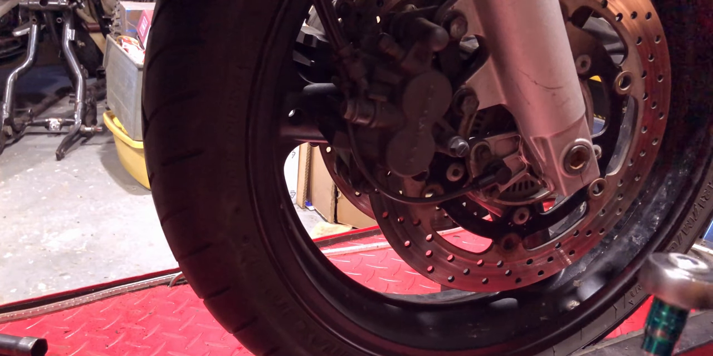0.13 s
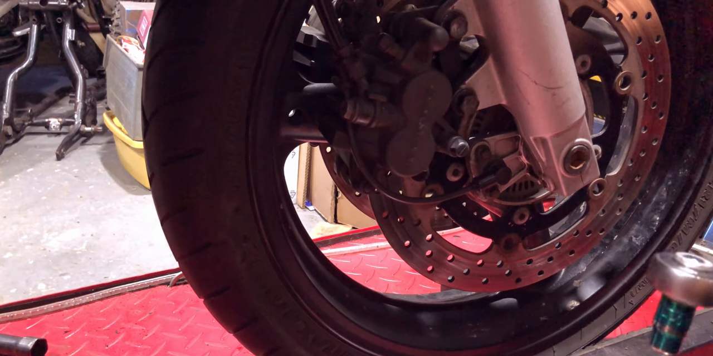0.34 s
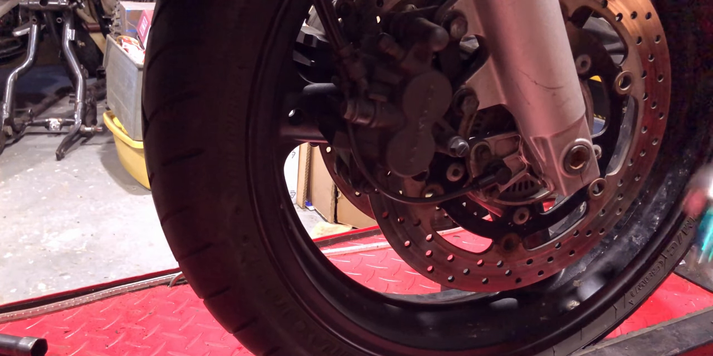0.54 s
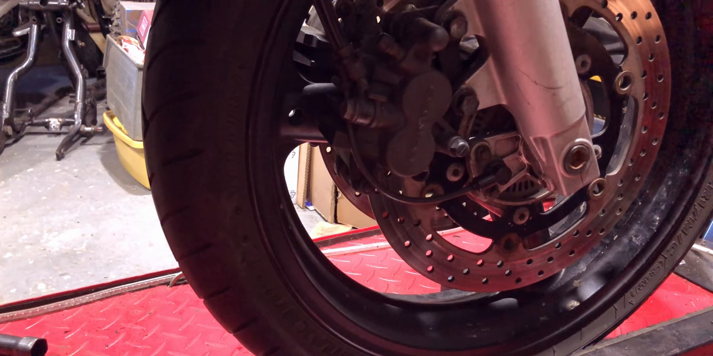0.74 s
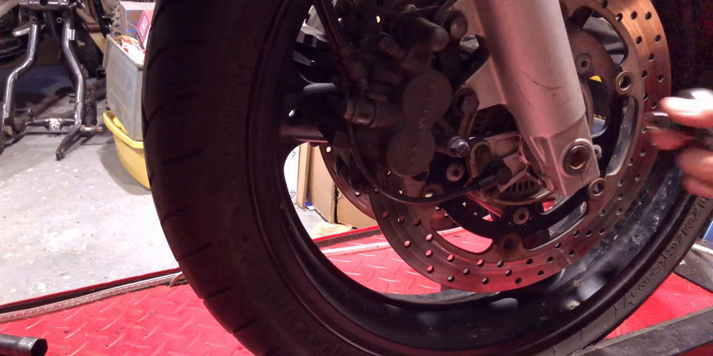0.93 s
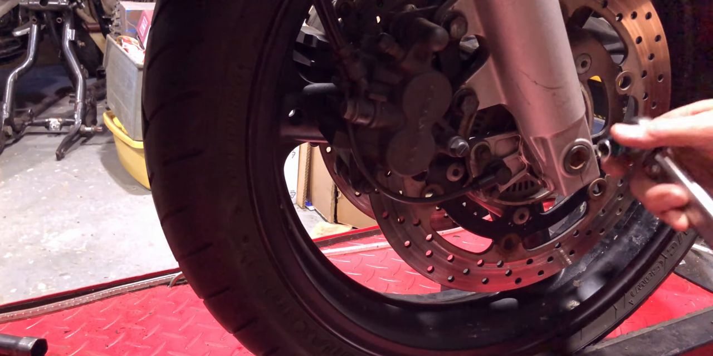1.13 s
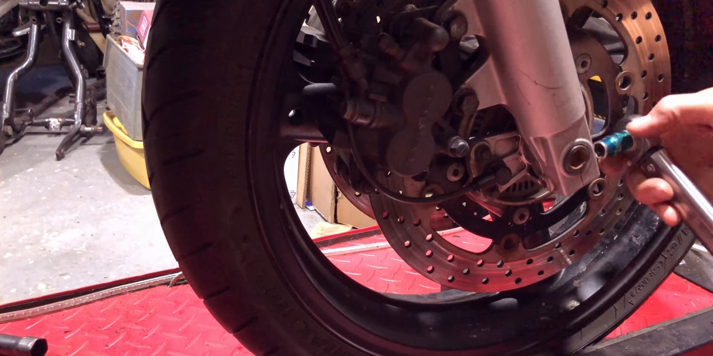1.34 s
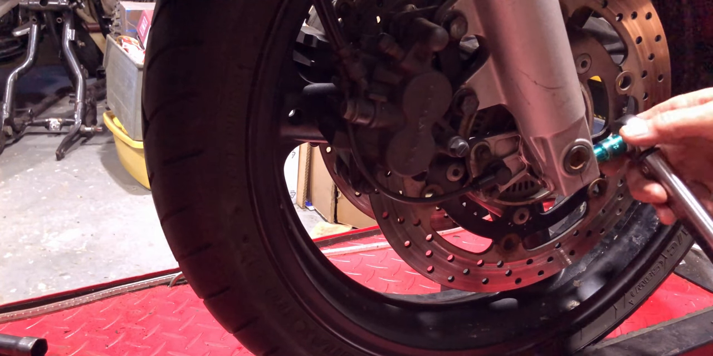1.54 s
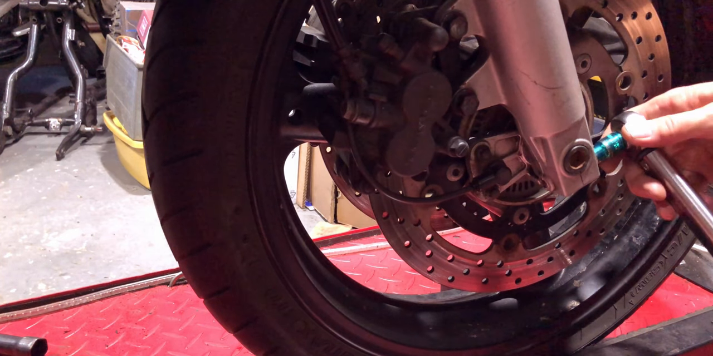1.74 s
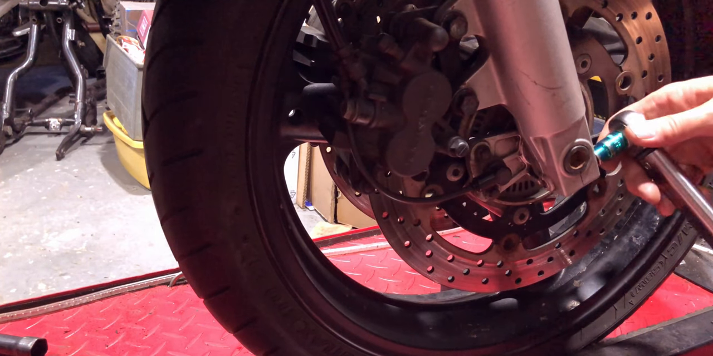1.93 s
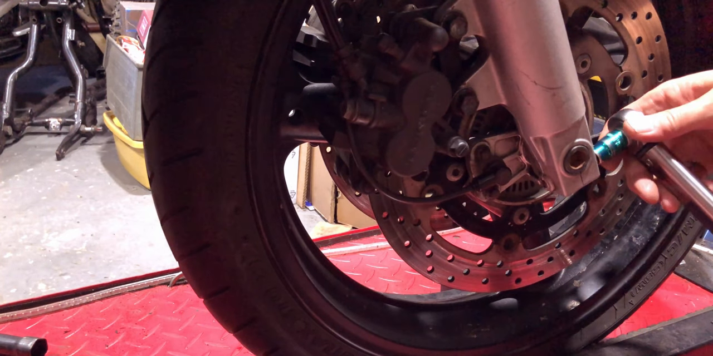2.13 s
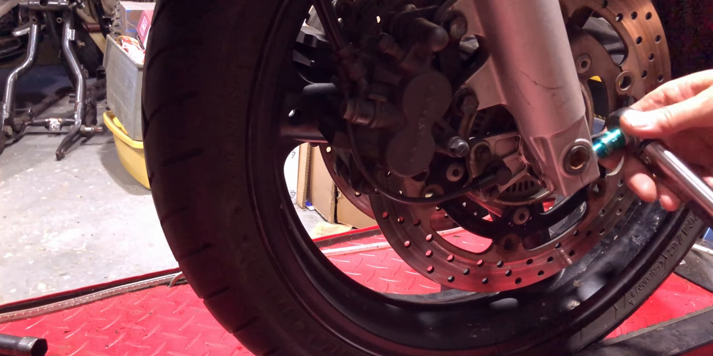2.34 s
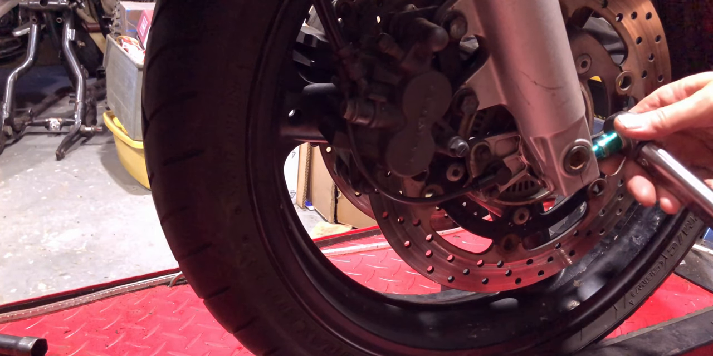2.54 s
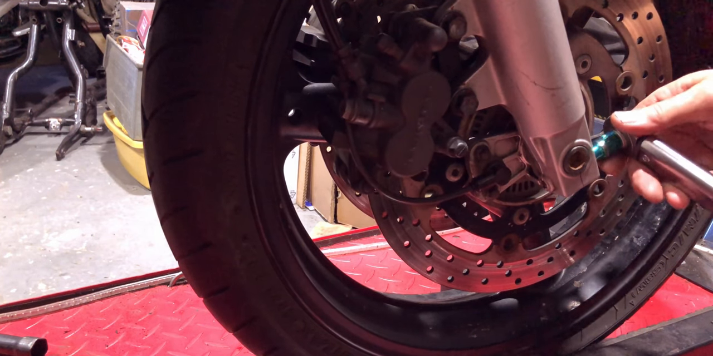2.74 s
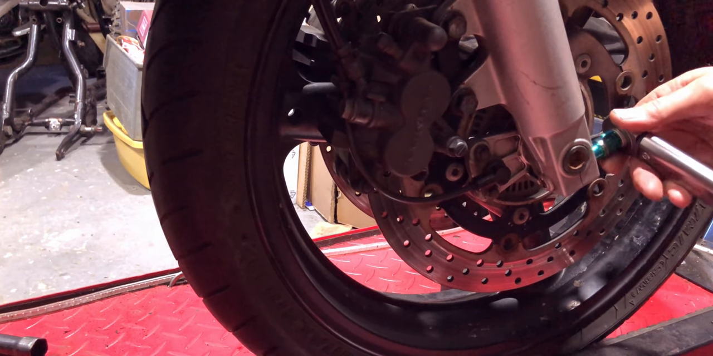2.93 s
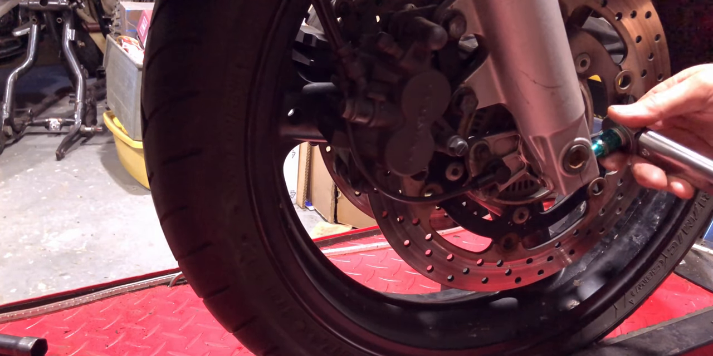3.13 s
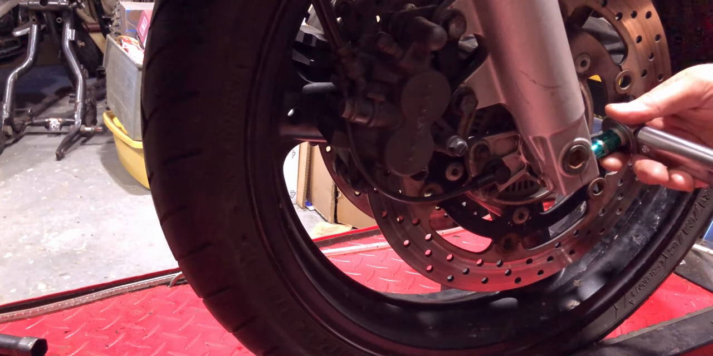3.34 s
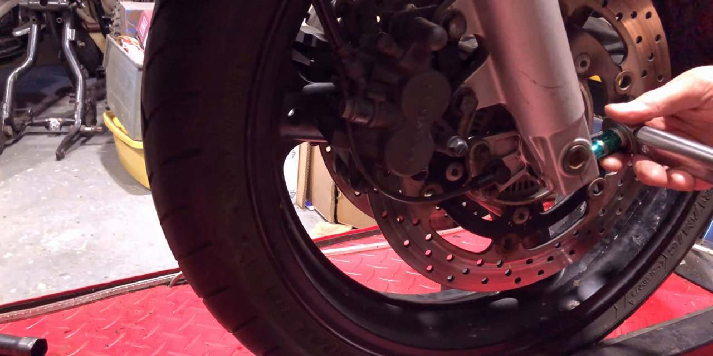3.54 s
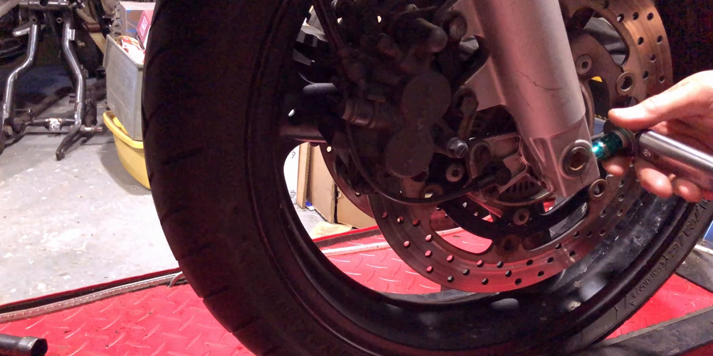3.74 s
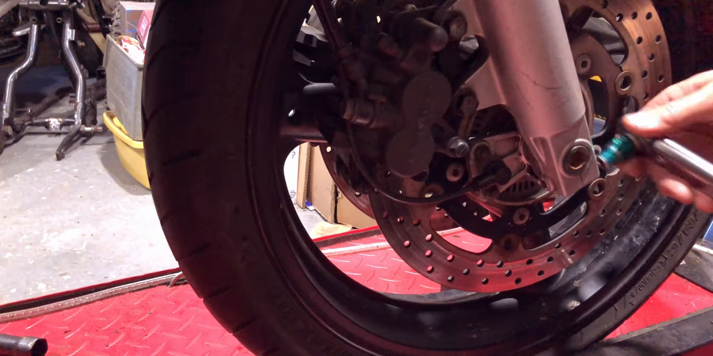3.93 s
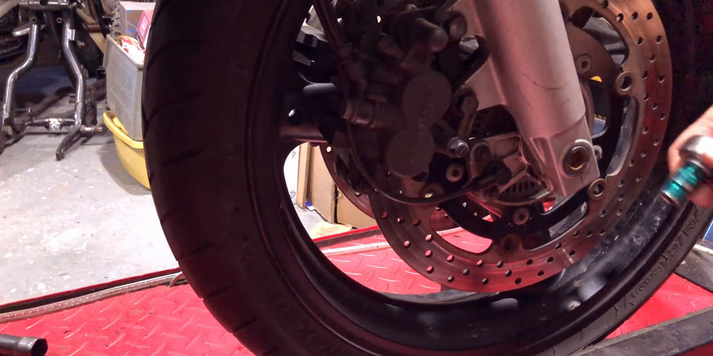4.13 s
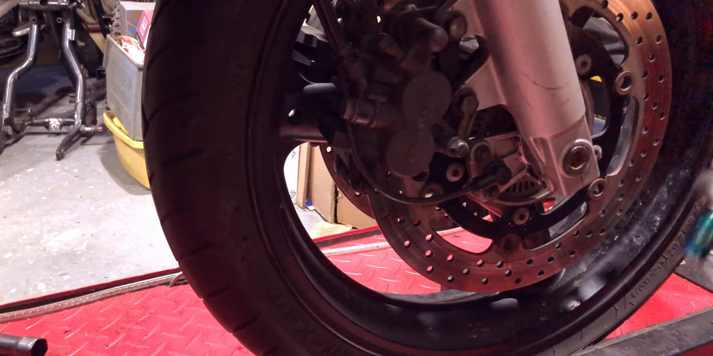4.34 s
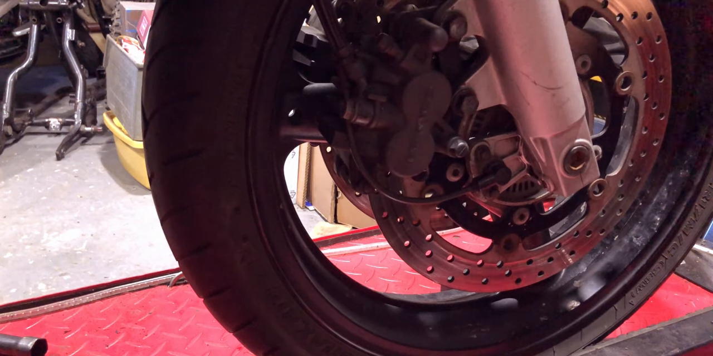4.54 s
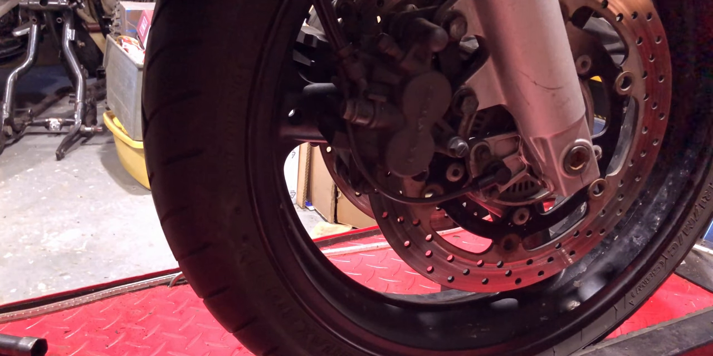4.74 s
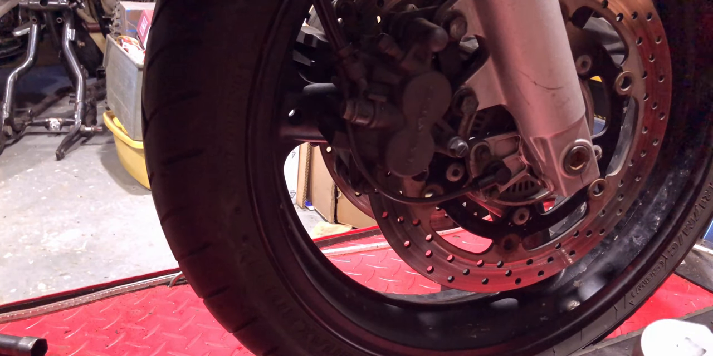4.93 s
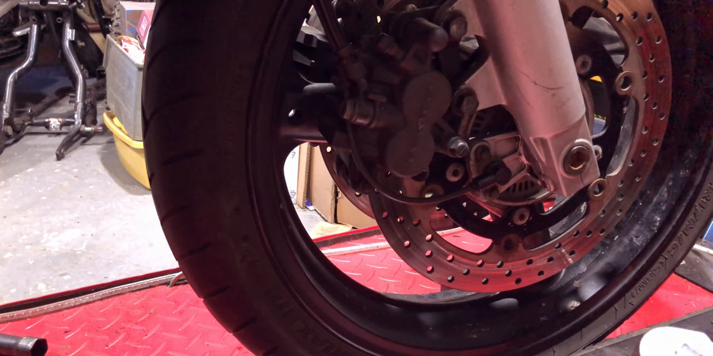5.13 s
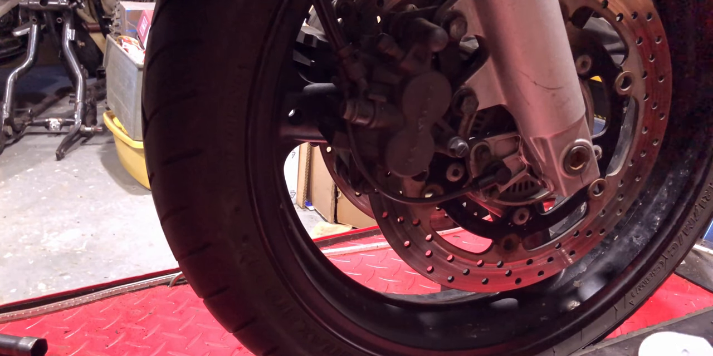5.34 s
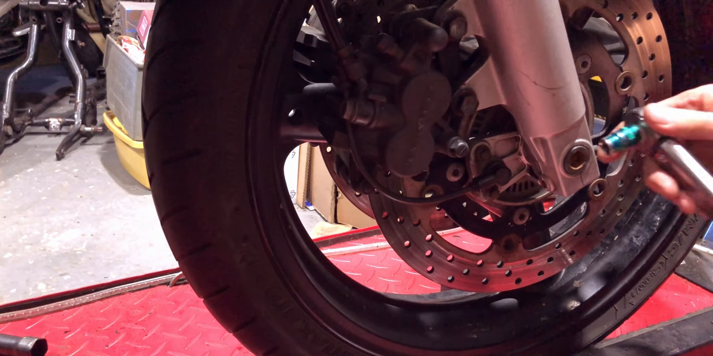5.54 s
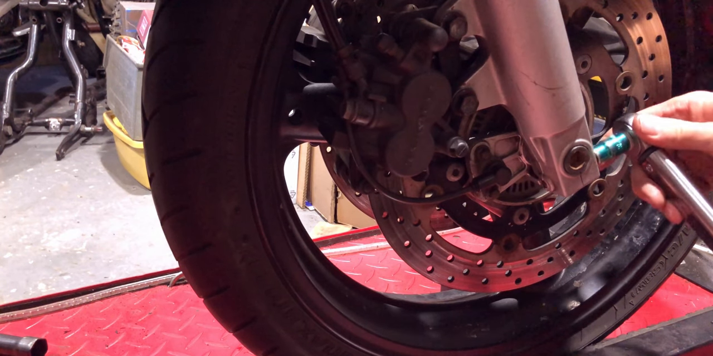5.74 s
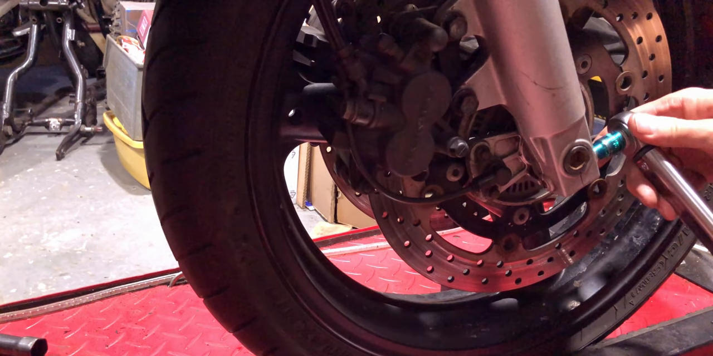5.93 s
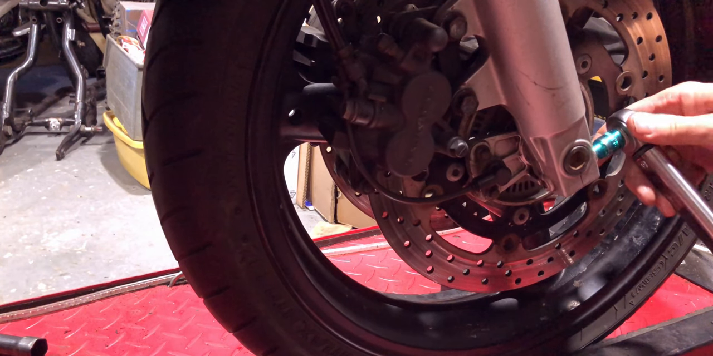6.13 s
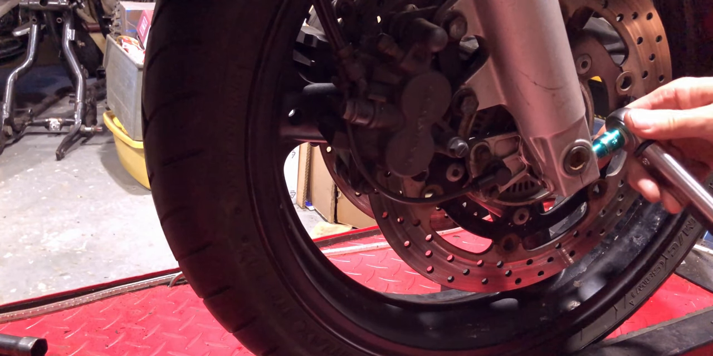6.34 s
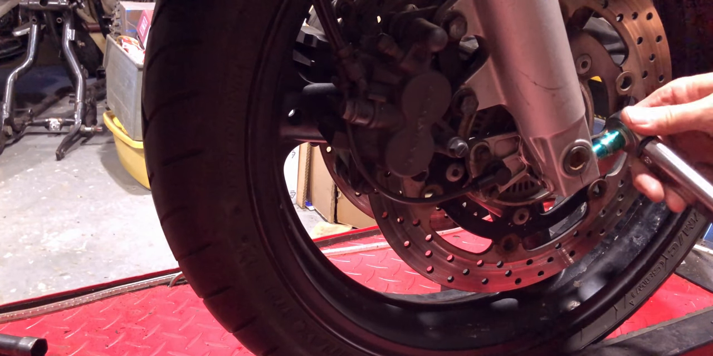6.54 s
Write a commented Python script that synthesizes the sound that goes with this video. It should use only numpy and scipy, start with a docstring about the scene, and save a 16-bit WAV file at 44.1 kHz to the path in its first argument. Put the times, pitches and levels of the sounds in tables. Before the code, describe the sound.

A torque wrench works on a motorcycle fork bolt, heard close up in a small garage with a short echo, a faint low rumble and a thin hiss. A sleeve rustles softly just before 1 second. At 1.3 and 1.5 seconds a steel socket knocks onto the bolt, briefly ringing the fork leg. Small scrapes and touches follow, then another clear knock at 2.5 seconds, with the brake disc ringing on very faintly. The wrench gives a lighter click at 2.7 seconds, clicks over with a loud, sharp metallic crack at 3.1 and snaps back almost as loudly at 3.8, each with a slight low thud. The socket scrapes lightly off at 4 seconds, and the sleeve rustles quietly until about 4.7. Around 5.8 to 6 seconds a few soft metal taps sound as the socket settles again.

```python
"""A torque wrench tightens a pinch bolt on a motorcycle fork, heard close up in a small garage.
The socket knocks and scrapes into place, ringing the fork leg; the wrench clicks over and snaps back,
its toggle rattling in the steel tube and jolting the front end. A few blows set the brake disc singing.
A sleeve rustles as the arm moves in and out, over a low rumble and a faint hiss."""
import sys
import numpy as np
from scipy import signal
from scipy.fft import rfft, irfft, next_fast_len
from scipy.io import wavfile
from scipy.ndimage import uniform_filter1d

SR = 44100
rng = np.random.default_rng(int(sys.argv[2]) if len(sys.argv) > 2 else 0)


def waveform_to_disk(signal):
    """Save audio, clipped to [-1, 1], as 16-bit WAV at the path in sys.argv[1]."""
    frames = np.transpose(np.atleast_2d(signal))
    scaled = np.clip(frames, -1, 1) * 32767
    samples = np.round(scaled).astype(np.int16)
    wavfile.write(sys.argv[1], SR, samples)


N = 290125

# wrench clicks: start_s, level_db, stroke (0 clicking over .. 1 snapping back), rattle_s,
# thump_db (relative to the click), thump_lag_s, tilt_db_per_octave
CLICK_CUES = [(2.7098, -25.5, 0.29, 0.0033, -12.5, .009, -1.5), (3.0929, -10, 0, 0.0033, -18.5, .0016, 2),
              (3.7714, -11.5, 1, 0.002, -16, 0.0018, 1.3)]


def undb(db):
    """Decibels to gain."""
    return 10 ** (np.asarray(db) / 20)


def unit(x):
    """Scale to an energy of one."""
    return x / np.sqrt(np.sum(x ** 2))


def level(x, db):
    """Scale to an rms level."""
    return unit(x) * np.sqrt(len(x)) * undb(db)


def blow(x, db):
    """Give a hit the energy of 5 ms at the stated level."""
    return unit(x) * np.sqrt(.005 * SR) * undb(db)


def fade(t, t60):
    """Exponential decay, 60 dB down after t60 seconds."""
    return np.exp(-np.log(1000) * t / max(t60, 1e-4))


def ring(t, modes):
    """Damped sines from rows of pitch_hz, t60_s, gain_db; neighbours swing in opposite directions."""
    return sum((-1) ** k * undb(db) * fade(t, t60) * np.sin(2 * np.pi * hz * t)
               for k, (hz, t60, db) in enumerate(modes))


def shape(x, db_of_hz):
    """Minimum-phase EQ with a given gain curve, built from its cepstrum."""
    size = 2 * next_fast_len(len(x))
    hz = np.maximum(np.fft.rfftfreq(size, 1 / SR), 1)
    cepstrum = irfft(np.log(undb(db_of_hz(hz))))
    cepstrum[1:size // 2] *= 2
    cepstrum[size // 2 + 1:] = 0
    return irfft(rfft(x, size) * np.exp(rfft(cepstrum)))[:len(x)]


def colour(x, points):
    """EQ through points of freq_hz, gain_db."""
    freq_hz, gain_db = np.transpose(points)
    return shape(x, lambda hz: np.interp(np.log(hz), np.log(freq_hz), gain_db))


def tilt(x, db_per_octave, corner_hz):
    """Brighten or dull above a corner: harder or softer contact."""
    return shape(x, lambda hz: db_per_octave * np.log2(1 + (hz / corner_hz) ** 2) / 2)


def wander(rate_hz):
    """Random modulation with an rms of one, gliding from value to value."""
    hold = int(SR / rate_hz)
    steps = np.repeat(rng.standard_normal(N // hold + 1), hold)
    return level(uniform_filter1d(steps, hold)[:N], 0)


def add(track, start_s, sound):
    """Mix a sound in at its cue."""
    start = int(start_s * SR)
    track[start:start + len(sound)] += sound[:N - start]


def room_tone(deep_db=-66, upper_db=-75, hiss_db=-76, growth_db_per_s=1.22, split_hz=130, waver_db=.5):
    """A low rumble from outside grows slowly and swells now and then under an even hiss."""
    # rumble spectrum: freq_hz, gain_db
    rumble_eq = [(15, -29), (24, -3.5), (40, -2), (72, 0), (100, -4), (125, -5.5), (160, -18), (215, -11.5),
                 (260, -18), (320, -21.5), (450, -28), (700, -43.5), (1500, -77.5)]
    # hiss spectrum: freq_hz, gain_db
    hiss_eq = [(290, -30), (500, -7), (1050, -8.5), (1400, -11.5), (1690, -11), (2160, -10.5),
               (3700, -12.5), (14500, -13), (16000, -24)]
    # rumble swells: peak_s, half_width_s, centre_hz, level_db
    swells = [(.15, 0.27, 208, -72), (4.62, 0.28, 172, -60.5), (6.451, 0.36, 101, -60)]
    t = np.arange(N) / SR
    rumble = colour(rng.standard_normal(N), rumble_eq)
    deep = signal.sosfilt(signal.butter(4, split_hz, "low", fs=SR, output="sos"), rumble)
    upper = signal.sosfilt(signal.butter(4, split_hz, "high", fs=SR, output="sos"), rumble)
    waver = undb(waver_db * wander(rate_hz=5.4))
    bed = undb(growth_db_per_s * t) * (level(deep, deep_db) + level(upper, upper_db) * waver)
    edge_ratio = 2 ** .54  # swells reach about half an octave either side of their centre
    for peak_s, half_width_s, hz, db in swells:
        band = signal.butter(4, [hz / edge_ratio, hz * edge_ratio], "band", fs=SR, output="sos")
        swell = level(signal.sosfilt(band, rng.standard_normal(N)), db)
        bed += swell * np.exp(-((t - peak_s) / half_width_s) ** 2)
    return bed + level(colour(rng.standard_normal(N), hiss_eq), hiss_db)


def sleeve_rustle(grain_db=3, grain_rate_hz=300):
    """Cloth slides in short strokes, its fibres catching unevenly."""
    # arm strokes: start_s, rise_s, fall_s, level_db
    strokes = [(0.681, 0.018, 0.16, -66), (.81, 0.054, 0.13, -66.5), (.965, 0.025, 0.29, -59.5),
               (2.808, 0.032, 0.026, -55), (3.979, 0.354, 0.065, -60.5), (4.572, 0.015, 0.034, -53.5),
               (4.6, 0.16, 0.17, -69), (5.573, 0.0082, 0.19, -64)]
    # cloth friction spectrum: freq_hz, gain_db
    cloth_eq = [(200, -21), (1200, -9), (2800, -4), (5500, -2.5), (9000, -1), (11000, -7), (15000, -10),
                (17000, -21.5)]
    t = np.arange(N) / SR
    envelope = sum(undb(db) * np.interp(t, [start, start + rise, start + rise + fall], [0, 1, 0])
                   for start, rise, fall, db in strokes)
    fibres = rng.standard_normal(N) * undb(grain_db * wander(grain_rate_hz))
    return envelope * level(colour(fibres, cloth_eq), 0)


def socket_knocks(dense_db=-1, dense_t60_s=.032, weight_hz=850, clean_s=.0009):
    """The socket hits the bolt or drags in tiny slips, ringing the fork. Rows: direct, reverb send."""
    # socket hits: start_s, level_db, tilt_db_per_octave, weight_db (low shelf), drag_s
    hits = [(.901, -60, -8, -16, 0.00049), (1.2923, -28, 1.5, 1, 0.00031), (1.492, -40, -7, 5, 0.00031),
            (1.5346, -31.5, -10, -5.5, 0.00041), (1.714, -50, -9, 13, 0.0036),
            (1.8689, -38, -4.5, 9, 0.0015), (2.4085, -42.5, -0.5, 4.5, 0.0053),
            (2.4766, -25.5, 2.5, 2.5, 0.000089), (3.972, -45, 0, 14, 0.0035),
            (5.7972, -46.5, -2.5, 14, 0.00033), (5.8378, -59, -2, 13, 0.00064),
            (5.8887, -45, -11.5, -0.5, 0.00021), (5.9477, -43, -3, 0, 0.00024)]
    # modes of the fork leg with the socket on it: pitch_hz, t60_s, gain_db
    fork_modes = [(485, 0.077, -17.5), (790, 0.051, -9), (1118, 0.053, 0), (1334, 0.039, -3.5),
                  (1715, 0.045, 0.5), (1893, 0.043, 0.5), (2180, .02, -10), (2625, .025, -8),
                  (3460, .022, -7.5), (4360, .02, -18), (5591, 0.058, -16.5)]
    # spectrum of the fork's dense modes: freq_hz, gain_db
    fork_eq = [(100, -23.5), (350, -16.5), (700, -11.5), (1200, 0), (1900, -1.5), (2500, -3.5), (3500, -8),
               (6000, -13), (10000, -26.5), (16000, -46)]
    direct, send = np.zeros((2, N))
    t = np.arange(SR // 8) / SR
    for start_s, db, tilt_db, weight_db, drag_s in hits + socket_shifts() + socket_gives():
        slips, grain = rng.standard_normal((2, len(t)))
        age = t / max(drag_s, 1e-4)
        scrape = unit(slips * np.abs(slips) * age * np.exp(-age))
        clean = np.exp(-drag_s / clean_s)  # short contacts are one clean strike, long ones all slips
        force = clean * signal.unit_impulse(len(t)) + (1 - clean) * scrape
        force = shape(force, lambda hz: weight_db / (1 + (hz / weight_hz) ** 6))
        force = tilt(force, tilt_db, corner_hz=1192.6)
        dense_ring = colour(grain * fade(t, dense_t60_s), fork_eq)
        fork = unit(ring(t, fork_modes)) + undb(dense_db) * unit(dense_ring)
        add(direct, start_s, blow(signal.fftconvolve(force, fork)[:len(t)], db))
        add(send, start_s, blow(colour(force, fork_eq), db))
    return np.array([direct, send])


def brake_disc(beat_hz=3.8, twin_db=-13):
    """The brake disc sings on faintly after a blow; its modes come in close pairs that beat gently."""
    # disc modes: pitch_hz, t60_s, gain_db
    modes = [(2100, 0.97, -5), (2820, 0.54, -5), (3660, 1.7, -4)]
    # blows that reach the disc: start_s, gain_db
    blows = [(1.2925, -59), (2.4772, -61), (3.0933, -63)]
    track = np.zeros(N)
    t = np.arange(2 * SR) / SR
    twins = [(hz + beat_hz, t60, db + twin_db) for hz, t60, db in modes]
    singing = ring(t, modes) - ring(t, twins)
    for start_s, db in blows:
        add(track, start_s, undb(db) * singing)
    return track


def socket_shifts(touches=3, weight_db=11, drag_s=.0031, scatter_db=1.5, jitter=.14):
    """Cues for socket_knocks: each shift on the bolt head breaks into light, unevenly spaced touches."""
    # shifts of the socket: start_s, length_s, level_db, tilt_db_per_octave
    shifts = [(1.436, 0.043, -52, -5.5), (1.976, 0.041, -59.5, -4), (2.073, 0.062, -63.5, -19.5),
              (2.391, 0.098, -54, -3), (2.677, 0.031, -55, 3), (2.93, .11, -70, -9.5),
              (3.707, .018, -66, 7.5), (5.901, 0.056, -58.5, -12.5), (6.187, .02, -70.5, -2)]
    cues = []
    for start_s, length_s, db, tilt_db in shifts:
        for k, (late, loud) in enumerate(rng.standard_normal((touches, 2))):
            touch_s = start_s + length_s * (k + jitter * late) / touches
            cues.append((touch_s, db + scatter_db * loud, tilt_db, weight_db, drag_s))
    return cues


def socket_gives(lead_s=.0022, relative_db=-28.5, tilt_db_per_octave=3.5, weight_db=-7, drag_s=.00079):
    """Cues for socket_knocks: under full torque the socket gives just before the wrench clicks over."""
    return [(click_s - lead_s, click_db + relative_db, tilt_db_per_octave, weight_db, drag_s)
            for click_s, click_db, stroke, *_ in CLICK_CUES if stroke < .5]


def wrench_clicks(crack_t60_s=.016, build_s=.000099, thump_send_db=-6):
    """The toggle slams into the tube, rattles and jolts the front end. Rows: direct, reverb send."""
    # modes of the wrench tube and head: pitch_hz, t60_s, click_over_db, snap_back_db
    wrench_modes = [(786, 0.027, -11.5, -12), (1147, 0.024, -12, 0.5), (1350, 0.0043, -10, -23.5),
                    (2060, 0.06, -10.5, -12), (2210, 0.17, -37.5, -19.5), (2240, 0.021, -9, 2.5),
                    (3678, 0.02, -3, 0.5), (3900, 0.01, 4.5, -16.5), (5290, .022, -7.5, 1),
                    (5960, 0.012, -17, -4.5), (6350, 0.0093, -16.5, -9.5), (7500, 0.03, 0.5, -4),
                    (8450, 0.023, -5.5, 2.5), (9030, .025, -5.5, -6.5), (9630, 0.024, -9.5, -11.5),
                    (9750, 0.02, -6.5, -15.5), (10870, 0.035, -17.5, -8), (11700, 0.022, -6, -11.5),
                    (13100, 0.013, -1.5, -10.5), (14050, 0.018, 1, -4.5)]
    # spectrum of the wrench's dense modes: freq_hz, gain_db
    wrench_eq = [(100, -13.5), (300, -16), (650, -8.5), (1100, -3.5), (2200, -4.5), (3000, -2.5), (5000, 3),
                 (8500, 2), (11000, -3.5), (14000, 3.5), (15000, -8), (16000, -14)]
    # thump spectrum of the motorcycle's front end: freq_hz, gain_db
    front_end_eq = [(40, -23.5), (110, -15), (170, -16.5), (260, -5.5), (330, -6.5), (435, 2.5), (530, -6),
                    (640, -23), (1500, -46)]
    direct, send = np.zeros((2, N))
    t = np.arange(SR // 4) / SR
    strike = signal.unit_impulse(len(t))
    for start_s, db, stroke, rattle_s, thump_db, thump_lag_s, tilt_db in CLICK_CUES:
        modes = [(hz, t60, over + stroke * (back - over)) for hz, t60, over, back in wrench_modes]
        tube = ring(t, modes) * (1 - np.exp(-t / build_s))  # the rattle pumps the modes up
        crack = rng.standard_normal(len(t)) * fade(np.maximum(t - rattle_s, 0), crack_t60_s)
        steel = unit(tube) + unit(colour(crack, wrench_eq))
        for track, sound in (direct, steel), (send, colour(strike, wrench_eq)):
            add(track, start_s, blow(tilt(sound, tilt_db, corner_hz=2000), db))
        thump = blow(colour(strike, front_end_eq), db + thump_db)
        add(direct, start_s + thump_lag_s, thump)  # the heavy wheel answers a moment later
        add(send, start_s + thump_lag_s, undb(thump_send_db) * thump)
    return np.array([direct, send])


def garage_reverb(send, onset_s=.0084, scatter_db=-11, scatter_t60_s=.031, standing_db=-19, build_s=.043):
    """Quick scatter off the wheel and lift, a short wall tail and slowly building standing waves."""
    # reverb tail bands: centre_hz, t60_s, gain_db
    tail_bands = [(150, .4, -12.5), (300, .27, -2), (596, 0.28, -8.5), (1200, 0.23, -9.5),
                  (2415, 0.23, -12.5), (4770, .22, -17), (9000, 0.18, -14.5), (14000, .16, -18)]
    # standing waves between the walls: pitch_hz, t60_s, gain_db
    room_modes = [(82.08, 0.41, -3), (131, .35, -6), (200, 0.6, 0.5), (256.5, 0.21, -5)]
    t = np.arange(SR * 3 // 4) / SR
    log_hz = np.log(np.maximum(np.fft.rfftfreq(len(t), 1 / SR), 1))
    log_centres = np.log([hz for hz, _, _ in tail_bands])
    noise_spectrum = rfft(rng.standard_normal(len(t)))
    attack = 1 - np.exp(-(t / onset_s) ** 2)
    scatter = rng.standard_normal(len(t)) * attack * fade(t, scatter_t60_s)
    response = undb(scatter_db) * unit(scatter)
    for (_, t60, db), weights in zip(tail_bands, np.eye(len(tail_bands))):
        band = irfft(noise_spectrum * np.interp(log_hz, log_centres, weights), len(t))
        response += undb(db) * band * unit(attack * fade(t, t60))
    standing = ring(t, room_modes) * (1 - np.exp(-t / build_s))
    response += undb(standing_db) * unit(standing)
    return signal.fftconvolve(send, response)[:N]


def scene():
    """Tool, motorcycle and sleeve in the garage, in mono."""
    # the walls hear the metal from every side, so single modes average out in the send
    direct, send = socket_knocks() + wrench_clicks() + sleeve_rustle()
    return (direct + garage_reverb(send) + brake_disc() + room_tone())[None]


def record(dry, top_hz=16000):
    """Clip at full scale and cut the extreme treble."""
    lowpass = signal.ellip(8, .2, 70, top_hz, fs=SR, output="sos")
    return signal.sosfilt(lowpass, np.clip(dry, -1, 1))


dry = scene()
out = record(dry)
waveform_to_disk(out)
```